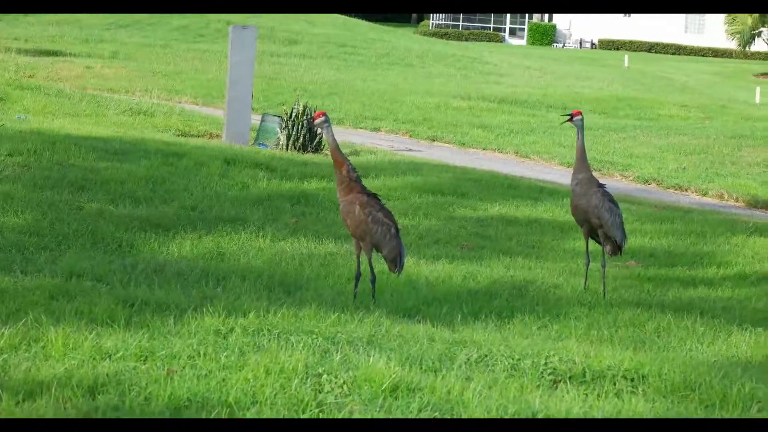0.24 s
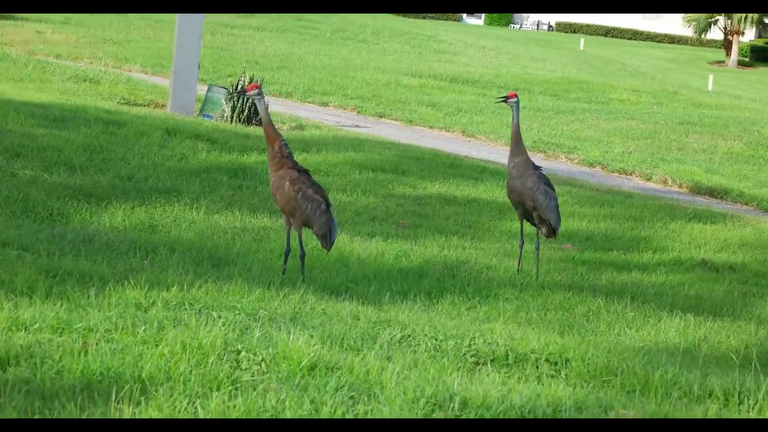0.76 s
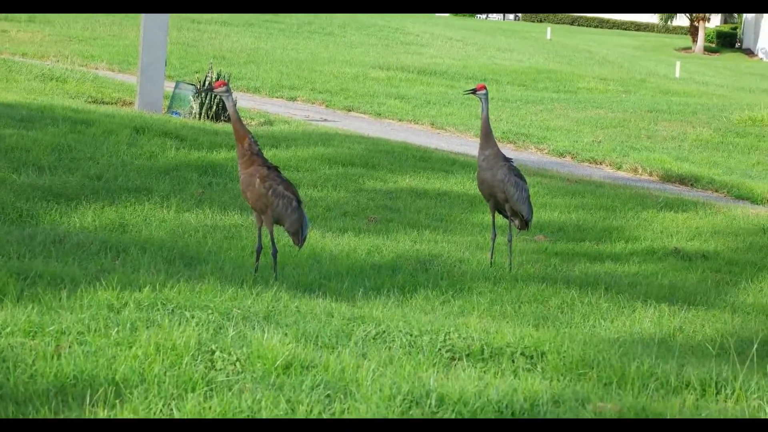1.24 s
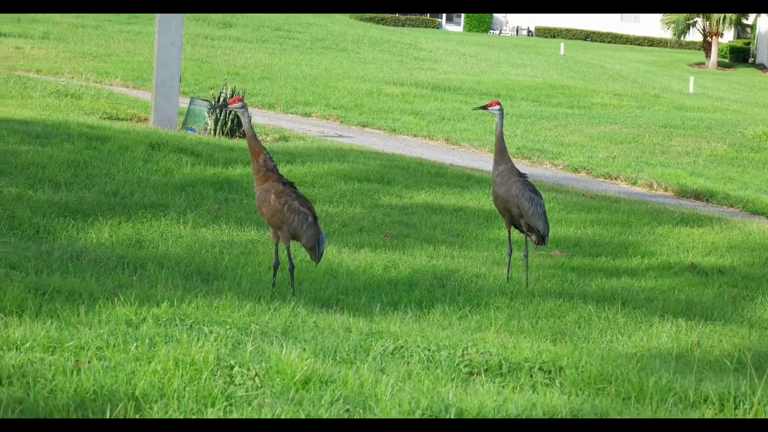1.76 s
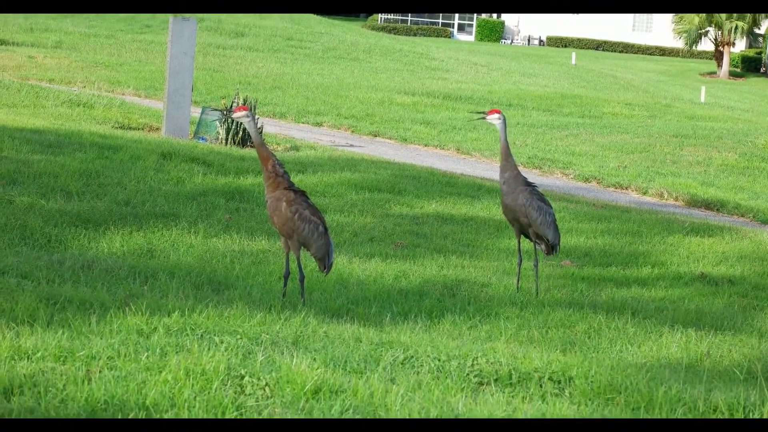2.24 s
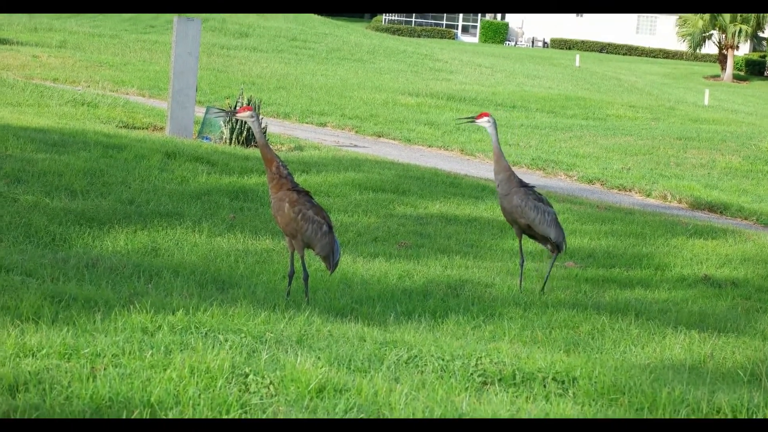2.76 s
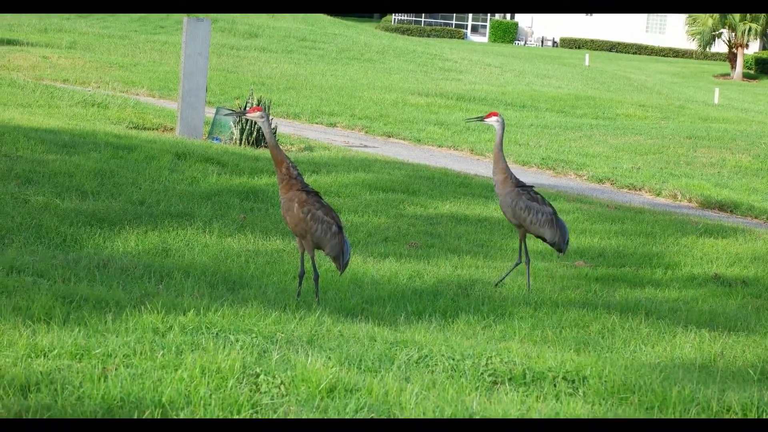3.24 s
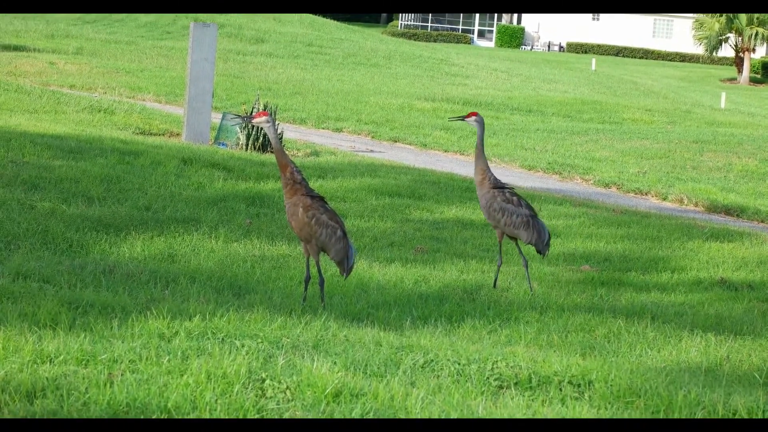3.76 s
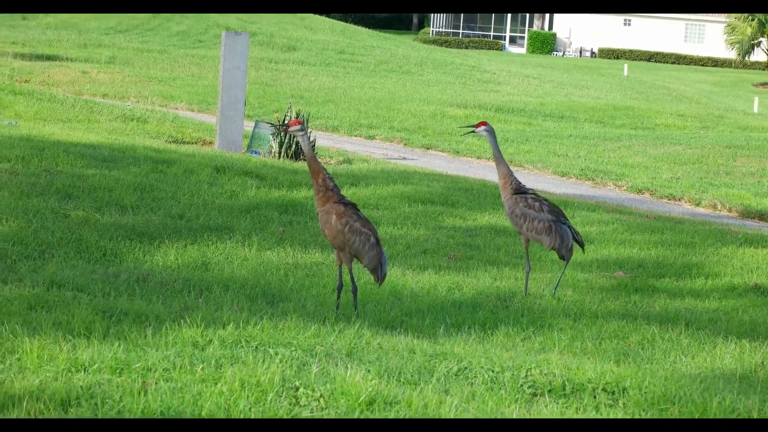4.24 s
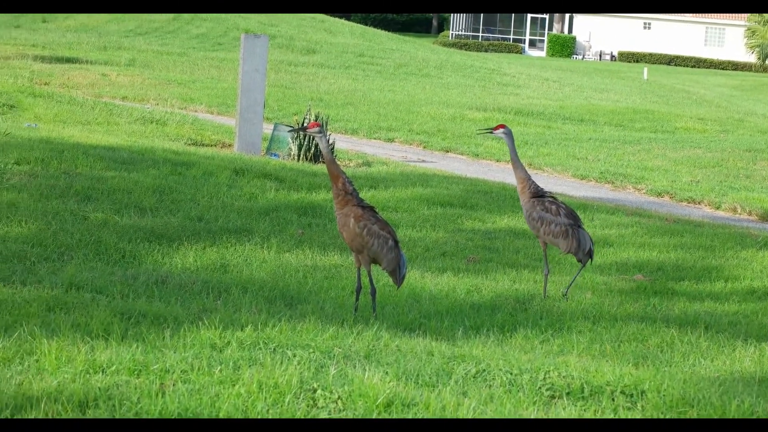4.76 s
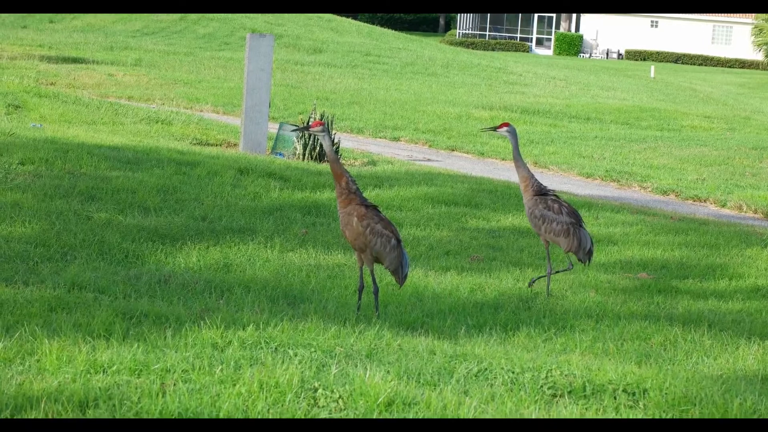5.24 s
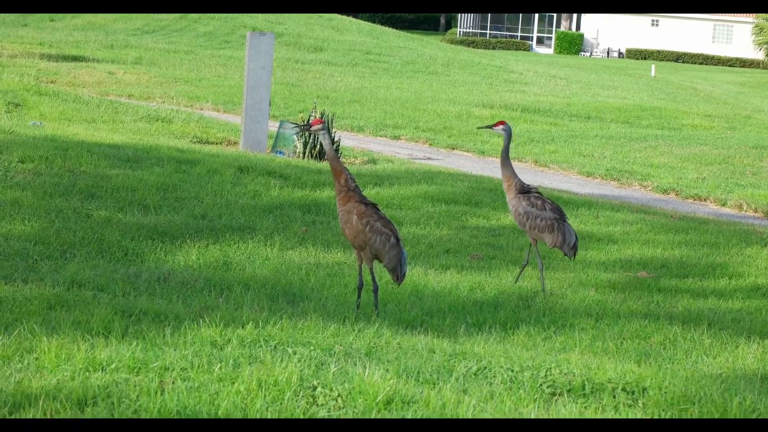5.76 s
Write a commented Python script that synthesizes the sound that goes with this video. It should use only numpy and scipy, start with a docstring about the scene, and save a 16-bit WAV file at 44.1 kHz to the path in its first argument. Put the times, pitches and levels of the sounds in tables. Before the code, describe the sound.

Two large cranes call on an open lawn over a quiet hush with a very faint, distant machine hum. Right at the start, the leader, straight ahead, gives a short hoarse honk and a loud, high rattle of reedy notes that quickens and gives out. Its partner, slightly to the right, joins lower and finishes alone at about 0.7 seconds. The duet repeats from 2.0 to 2.9 seconds and from 3.8 to 4.6 seconds. At 5.8 seconds the leader honks again and starts another rattle as the sound ends. Each duet leaves a soft tail among the trees and a thin, late echo off a house. Small birds whistle faintly at about 1.7 and 3.2 seconds, and a far crane calls softly near 5.5 seconds. The loudest early notes slightly overload the microphone, and the overall level falls steadily.

```python
"""Sandhill crane duet on a lawn

Two cranes call: a hoarse honk, then a rattle of reedy notes that quickens and gives out. Membranes in
the syrinx are the source and the long windpipe is the filter. The leader is high and loud; its partner
joins in lower and finishes alone. Grass, trees and a house reflect the calls; small birds and a far crane
sound over a quiet hush. The loudest notes overload the microphone, and the whole level fades steadily."""
import sys
import numpy as np
from scipy import signal
from scipy.fft import rfft, irfft, next_fast_len
from scipy.io import wavfile
from scipy.ndimage import map_coordinates

SR = 44100
rng = np.random.default_rng(int(sys.argv[2]) if len(sys.argv) > 2 else 0)


def materialize(psi):
    """Save the field psi as 16-bit PCM at rate SR to the path in sys.argv[1].

    A 1-D psi becomes a single channel; in a 2-D psi each row is a channel.
    """
    bounded = np.clip(np.atleast_2d(psi).T, -1, 1)
    quanta = np.round(bounded * 32767).astype(np.int16)
    wavfile.write(sys.argv[1], SR, quanta)


N = 264644
TOP_HZ = 15800


def amp(db):
    """Amplitude ratio of a level in decibels."""
    return 10 ** (np.asarray(db) / 20)


def unit(x):
    """Normalisation to an rms of 1."""
    return x / np.sqrt(np.mean(x ** 2) + 1e-20)


def along(points, hz):
    """Interpolation of (Hz, value) points on a logarithmic frequency axis."""
    f, v = np.transpose(points)
    return np.interp(np.log(hz + 1), np.log(f + 1), v)


def wobble(rate, t):
    """Smooth random modulation, with rate knots per unit of t."""
    return map_coordinates(rng.standard_normal(1024), [t * rate], mode="wrap")


def filtered(x, response):
    """Linear filtering: the spectrum times a complex frequency response."""
    size = next_fast_len(N + SR)
    return irfft(rfft(x, size) * response(np.fft.rfftfreq(size, 1 / SR)), size)[..., :N]


def delay(hz, s):
    """A delay of s seconds is a phase lag proportional to frequency."""
    return np.exp(-2j * np.pi * hz * s)


def span(s, length):
    """The samples of an event, and the time since its onset."""
    i = np.arange(max(0, int(s * SR) + 1), min(N, int((s + length) * SR)))
    return i, i / SR - s


def add(out, i, sound, db):
    """Superposition of a sound on out at the samples i."""
    out[i] += amp(db) * sound


# Each row: frequency in Hz, relative spectral density in dB.
HUSH_SPECTRUM = [(20, -30.5), (50, -13.5), (120, -8.5), (200, -12), (400, -11), (800, -8.5), (1300, -12),
                 (2300, -20), (4200, -21), (5200, -26.5), (10000, -32), (15000, -36)]
# Each row: frequency in Hz, correlation of left and right.
HUSH_COHERENCE = [(60, 0.94), (130, .92), (290, 0.27), (640, 0.34), (1400, 0.0064), (15000, 0)]
# Each row: frequency in Hz, level in dB.
MACHINE_HUM = [(471, -64.5), (587, -64)]

def hush(hush_db=-53.5):
    """Distant noise is coherent at long wavelengths; a far machine adds a faint, unsteady hum."""
    t = np.arange(N) / SR
    angle = lambda f: np.arccos(np.clip(along(HUSH_COHERENCE, f), -1, 1)) / 2
    spectrum = lambda f: amp(along(HUSH_SPECTRUM, f)) * [np.cos(angle(f)), np.sin(angle(f))]
    mid, side = filtered(rng.standard_normal((2, N)), spectrum)
    drift_db = .5 * wobble(5, t)
    hum = sum(amp(db + 1.2 * wobble(1.9, t)) * np.sin(2 * np.pi * hz * t + wobble(12, t))
              for hz, db in MACHINE_HUM)
    return amp(hush_db + drift_db) * unit(np.array([mid + side, mid - side])) + hum


def diffuse(x, bands, rise_s):
    """Diffuse reverberation: reflections, uncorrelated left and right, build up and decay by band."""
    bands = np.array(bands)
    hz, t, noise = signal.stft(rng.standard_normal((2, SR + SR // 2)), SR, nperseg=128)
    decay = amp(-60 * t / along(bands[:, :2], hz)[:, None])
    envelope = decay * (1 - np.exp(-(t / rise_s) ** 2))
    gain = amp(along(bands[:, ::2], hz))[:, None] / np.sqrt(np.mean(envelope ** 2, axis=1, keepdims=True))
    tail = signal.istft(noise * envelope * gain, SR, nperseg=128)[1]
    return signal.fftconvolve(x[None], tail / np.sqrt(tail.shape[1]), axes=1)[:, :N]


# Each row: frequency in Hz, 60 dB decay time in seconds, gain in dB.
TREE_REVERB = [(303.8, .8, -29), (970, 1.1, -24.5), (1480, 1.8, -18.5), (3130, 1.4, -24),
               (6400, 0.45, -14.5), (14380, 0.71, -16)]

def trees(x, rise_s):
    """Multiple scattering among trees gives a long reverberant tail."""
    return diffuse(x, TREE_REVERB, rise_s)


# Each row: start and length in seconds, start and end pitch in Hz, level in dB,
# waver as a fraction of the pitch, relative level of the second harmonic in dB.
FAR_CALLS = [(1.646, 0.26, 3470, 3030, -64, 0.0028, -41.5), (1.797, .16, 3380, 3230, -62, .004, -32.5),
             (3.232, 0.18, 7850, 7950, -71, .02, -39.5), (5.459, 0.1193, 967, 1188, -49, 0.017, -21.5),
             (5.53, 0.083, 787, 723, -47.5, 0.017, -13.5)]

def far_birds(wet_db=16):
    """Frequency-modulated glides of small birds and a far crane; at a distance reverberation dominates."""
    out = np.zeros(N)
    for s, length, start_hz, end_hz, db, waver, second_db in FAR_CALLS:
        i, t = span(s, length)
        pitch = (start_hz + (end_hz - start_hz) * t / length) * (1 + waver * wobble(400, t))
        phase = 2 * np.pi * np.cumsum(pitch) / SR
        tone = np.sin(phase) + amp(second_db) * np.sin(2 * phase)
        add(out, i, np.sin(np.pi * t / length) * tone, db)
    return out + amp(wet_db) * trees(out, rise_s=.034)


# Each row: frequency in Hz, 60 dB decay time in seconds, gain in dB.
WALL_ECHO = [(500, .05, -48), (1000, 0.067, -56), (1800, .05, -34), (3260, .04, -23), (6000, 0.029, -27.5),
             (12000, .04, -40)]

def house(call, delay_s=.495):
    """Reflection from a distant wall: one thin, late echo, smeared by hedge and eaves."""
    return diffuse(filtered(call, lambda f: delay(f, delay_s)), WALL_ECHO, rise_s=.002)


# Each row: frequency in Hz, 60 dB decay time in seconds, gain in dB.
GRASS_SCATTER = [(500, 0.067, -25), (1105, 0.037, -22.5), (1600, 0.024, -14), (3000, 0.12, -10),
                 (5960, .035, -13), (14000, 0.016, -7.5)]

def grass(call):
    """Scattering from rough ground adds a short tail."""
    return diffuse(call, GRASS_SCATTER, rise_s=.003)


# Each row: delay in seconds, amplitude gain.
NEAR_ECHOES = [(.00751, 0.023), (.00826, 0.037), (.0099, 0.091), (.0123, 0.18)]

def direct(call, ports, ripple_rad=.5):
    """Level and phase differences at two ports give direction; nearby reflections form a comb filter."""
    sides, ports = np.array([[.5], [-.5]]), np.array(ports)
    # the body that holds the microphone scatters the treble
    ripple = lambda f: ripple_rad * np.minimum(f / 4000, 1) ** 2 * wobble(.004, f)
    lead = lambda f: along(ports[:, ::2], f) + ripple(f)
    pickup = lambda f: amp(sides * along(ports[:, :2], f)) * np.exp(1j * sides * lead(f))
    comb = lambda f: 1 + sum(gain * delay(f, s) for s, gain in NEAR_ECHOES)
    return filtered(call, lambda f: pickup(f) * comb(f))


# Modes of windpipe and bill. Each row: frequency in Hz, bandwidth in Hz, gain in dB.
WINDPIPE_MODES = [(653.3, 69, -7.5), (845.5, 84.4, 4), (1067.5, 206, -0.5), (1461, 54, -2), (1670, 63, -5),
                  (1787, 66, -4), (1990, 150, -2.5), (2318, 83, -2.5), (2588, 140, -7.5), (3302, 310, -6),
                  (3351, 560, -1.5), (4350, 670, -5), (4966, 210, -6), (6404, 840, -6), (7800, 2000, -9),
                  (8530, 563.0, -7.5), (9330, 370, -15.5), (12100, 2342.0, -23.5)]

def windpipe(source, blur=1.8, around_db=-3.5):
    """Resonance of an air column: sharp peaks in the sound sent forward, broader ones all around."""
    mode = lambda f, hz, width, db: amp(db) * 1j * f * width / (hz * hz - f * f + 1j * f * width)
    forward = lambda f: sum((-1) ** k * mode(f, *row) for k, row in enumerate(WINDPIPE_MODES))
    around = lambda f: np.sqrt(sum(np.abs(mode(f, hz, blur * width, db)) ** 2
                                   for hz, width, db in WINDPIPE_MODES))
    return filtered(source, forward), amp(around_db) * filtered(source, around)


def reed(pitch, push, rolloff, rasp_db):
    """A pressure-driven valve: harmonics grow with the push of air, and turbulence bursts once a cycle."""
    k = np.arange(1, 21, dtype=float)[:, None]
    phase = 2 * np.pi * np.cumsum(pitch) / SR
    tone = (k ** -rolloff * push ** np.sqrt(k) * np.sin(k * phase) * (k * pitch < TOP_HZ)).sum(0)
    hiss = rng.standard_normal(size=8192)[:len(pitch)]
    return tone + amp(rasp_db) * push * hiss * (1 + np.cos(phase))


def note(s, length, hz, rolloff, arch=.53, swell=.62, jitter=.03, rasp_db=-24):
    """Pitch follows pressure: a puff drives it quickly up, then down. Low, slack notes are raspier."""
    i, t = span(s, length)
    progress = np.clip(t / length, 0, 1) ** swell
    push = np.abs(np.sin(np.pi * progress))
    slack = np.clip((1100 - hz) / 300, 0, 1)
    waver = (jitter + .05 * slack) * wobble(900, t)
    pitch = hz * (1 - arch * (2 * progress - 1) ** 2) * (1 + waver)
    return i, reed(pitch, push, rolloff, rasp_db + 5 * slack)


def honk(s, length, start_hz, end_hz, rolloff, rough, jitter=.07, shimmer_db=6):
    """Jitter and shimmer, irregular pitch and strength from cycle to cycle, make a held glide hoarse."""
    i, t = span(s, length)
    progress = np.clip(t / length, 0, 1)
    push = np.abs(np.sin(np.pi * progress)) ** .77
    pitch = (start_hz + (end_hz - start_hz) * progress) * (1 + rough * jitter * wobble(600, t))
    shimmer = amp(rough * shimmer_db * wobble(500, t))
    return i, shimmer * reed(pitch, push, rolloff, rasp_db=-24)


def rattle(length, stretch, beat, effort, count=12):
    """A pulse train whose gaps settle geometrically; gives each note's age, pitch, length, dB, rolloff."""
    first_gap, last_gap, kept = beat
    gaps = stretch * (last_gap + (first_gap - last_gap) * kept ** np.arange(count))
    ages = np.cumsum(gaps) - gaps
    ages = ages[ages < length]
    share, *columns = np.transpose(effort)
    return zip(ages, *(np.interp(ages / ages[-1], share, column) for column in columns))


def syrinx(calls, beat, effort, rebounds=(), scatter_db=.5, pitch_scatter=.0054, scatter_s=.0012):
    """Airflow sets membranes oscillating: each call is a honk, then a rattle of slightly uneven notes."""
    out = np.zeros(N)
    for start, length, stretch, call_db, dull, registers, honk_db in calls:
        for before, held, start_hz, end_hz, db, rolloff, rough in registers:
            add(out, *honk(start - before, held, start_hz, end_hz, rolloff, rough), honk_db + db)
        for age, hz, held, db, rolloff in rattle(length, stretch, beat, effort):
            louder, higher, later = rng.standard_normal(size=3)
            onset, level_db = start + age, call_db + db + scatter_db * louder
            add(out, *note(onset, held, hz * (1 + pitch_scatter * higher), rolloff + dull), level_db)
            for after, flap_db in rebounds:
                flap = note(onset + after + scatter_s * later, length=.0053, hz=830, rolloff=1.2)
                add(out, *flap, level_db + flap_db)
    return out


# A honk's registers. Each row: lead before the rattle and length in seconds, start and end pitch in Hz,
# level in dB, harmonic rolloff exponent, roughness from 0 to 1.
LOW_HONK = [(.125, .037, 524, 562, -12.5, 1.05, .5)]
# Each row: rattle start and length in seconds, stretch factor of its beat, its gain in dB,
# its extra rolloff, honk table, honk gain in dB.
PARTNER_CALLS = [(.2664, .465, .961, -1, -.1, LOW_HONK, 3), (2.3287, .525, .976, .6, -.03, LOW_HONK, .3),
                 (4.146, .48, 1.001, 0, .06, LOW_HONK, -3)]
# Each row: fraction of the rattle, top pitch in Hz, note length in seconds, level in dB, rolloff exponent.
PARTNER_EFFORT = [(0, 859.6, .0093, -5.5, .92), (.45, 851.7, .0078, -6, 1.1), (.75, 813.6, .008, -3, 1.07),
                  (0.891, 752, .0105, -4.5, 1.37), (1, 838, 0.0024, -16.5, 1.2)]
# Each row: delay from the note's onset in seconds, level relative to the note in dB.
REBOUNDS = [(.0075, -10.5), (.0138, -9)]

def partner():
    """The lower voice: its membranes rebound, flapping twice more after each rattle note."""
    beat = (.0763, .0575, .64)  # first and limiting gap in seconds, share of the excess kept per note
    return syrinx(PARTNER_CALLS, beat, PARTNER_EFFORT, REBOUNDS)


# A honk in one register and a honk that breaks through three. Each row: as in LOW_HONK.
CLEAR_HONK = [(.136, 0.07, 531.5, 637, -14, .88, .3)]
BREAKING_HONK = [(.1275, .018, 575, 517, -14.5, 1.35, 0.49), (.1145, .016, 645, 692, -13, 1.3, .63),
                 (.101, .025, 765, 761, -5.5, 1.8, 0.61)]
# Each row: as in the partner's calls and effort.
LEADER_CALLS = [(.1175, .415, .958, -0.88, -.08, CLEAR_HONK, 0),
                (2.164, .48, 0.99, -0.25, .1, BREAKING_HONK, 0.4),
                (3.936, .435, 1, 0.2, .02, BREAKING_HONK, 0.6),
                (5.915, .435, 1, 0.3, -.07, BREAKING_HONK, 0.9)]
LEADER_EFFORT = [(0, 1091, 0.014, 3, 1.0), (0.169, 1122, 0.011, -1.95, .86), (.33, 1133, .012, -1.7, 0.81),
                 (0.597, 1127, .019, -3, 0.96), (0.882, 1037, .013, -4, 0.98),
                 (0.999, 823.5, .0068, -14, 1.3)]

def leader():
    """The louder voice: its membranes oscillate at a higher fundamental, in a faster pulse train."""
    return syrinx(LEADER_CALLS, beat=(.071, .0495, .67), effort=LEADER_EFFORT)


# Paths to the two microphone ports, the leader ahead and the partner to the right.
# Each row: frequency in Hz, left minus right level in dB, phase lead of the left in radians.
LEADER_PORTS = [(500, -3, -.05), (850, -1.8, .05), (1100, .5, 0), (1300, 3, .3), (1500, -.5, .3),
                (2400, 1, 0), (3050, -4.5, -.3), (3800, 0, -.4), (4800, -7, -1.4), (5800, 1, 1),
                (7100, -4, -.6), (15000, -2, -.8)]
PARTNER_PORTS = [(500, -3, -.05), (850, -1.8, 0), (1200, 2.5, 0), (1450, -1, .3), (2000, 0, -.2),
                 (2700, 3, -1.1), (3150, -3.5, -1.1), (3900, 1, -1.8), (5600, -7, -2.1), (7500, -2.5, -2.1),
                 (15000, -6, -2)]

def cranes():
    """Multipath propagation: both voices arrive directly and by reflection; the partner faces the house."""
    (high, low), around = windpipe(np.array([leader(), partner()]))
    straight = direct(high, LEADER_PORTS) + direct(low, PARTNER_PORTS)
    return straight + house(low) + grass(high + low) + trees(around.sum(axis=0), rise_s=.23)


def scene():
    """Superposition of cranes, far birds and the hush of the lawn."""
    return cranes() + far_birds() + hush()


def record(dry, ceiling=.98, offset=.017, low_cut_hz=170, damping=.8, start_gain=.96, fade_per_s=.12):
    """Asymmetric clipping flattens the loudest peaks and adds a soft thump; the gain falls linearly."""
    excess = np.clip(dry, -ceiling - offset, ceiling - offset) - dry
    highpass = lambda f: f * f / (f * f - low_cut_hz ** 2 - 1j * damping * f * low_cut_hz)
    clipped = dry + filtered(excess, highpass)  # the thump loses its slow part
    fade = start_gain - fade_per_s * np.arange(N) / SR
    return filtered(clipped * fade, lambda f: f < TOP_HZ)


dry = scene()
out = record(dry)
materialize(out)
```